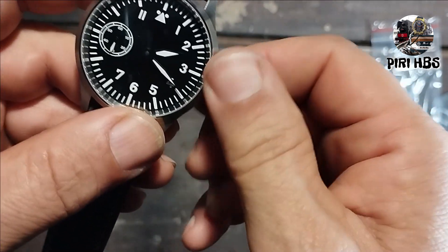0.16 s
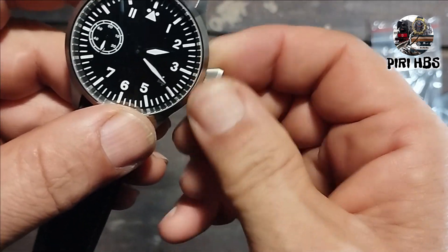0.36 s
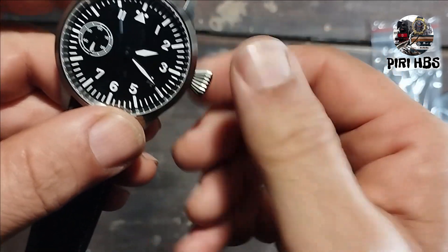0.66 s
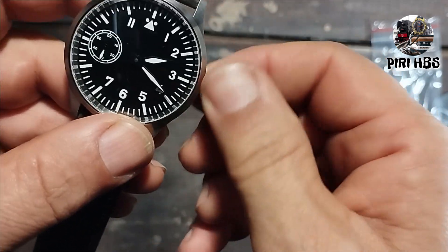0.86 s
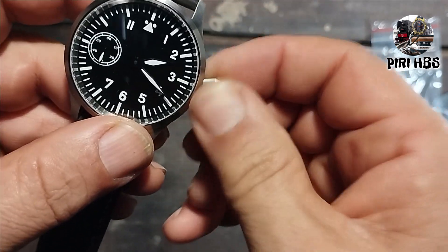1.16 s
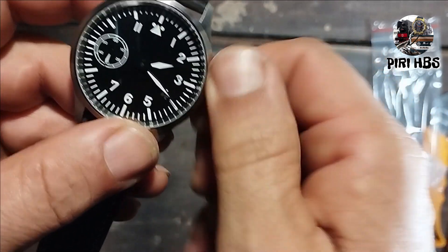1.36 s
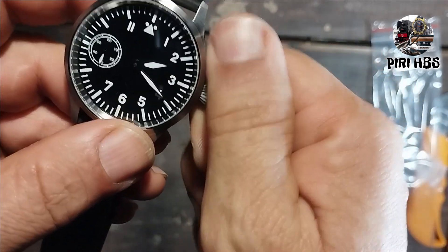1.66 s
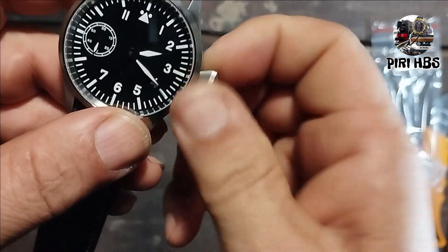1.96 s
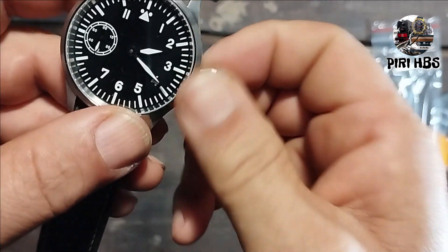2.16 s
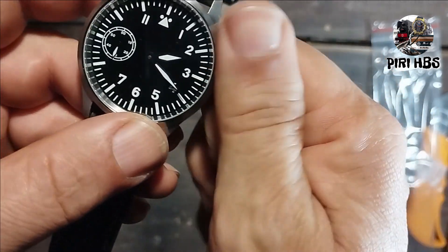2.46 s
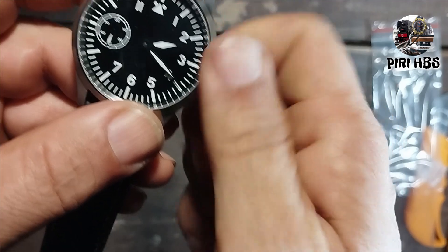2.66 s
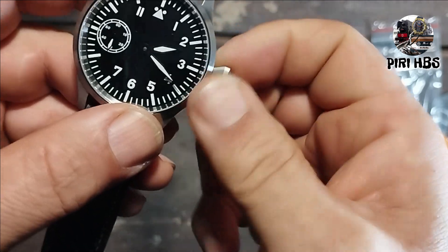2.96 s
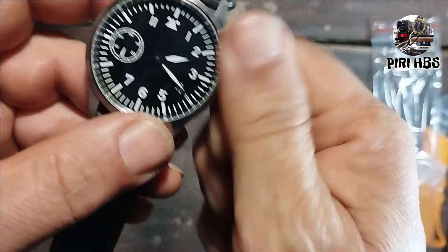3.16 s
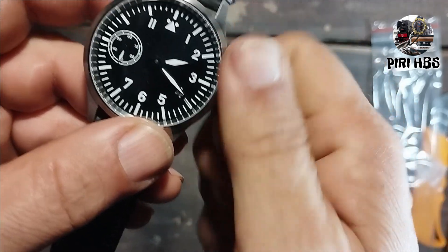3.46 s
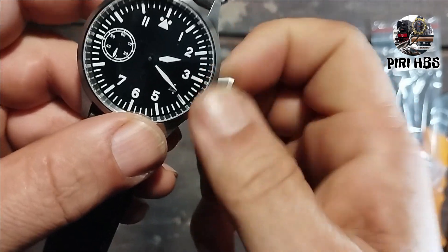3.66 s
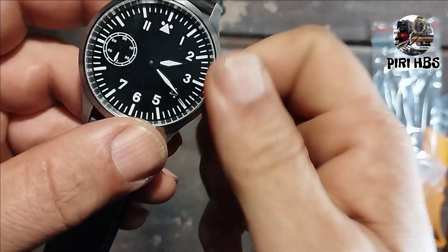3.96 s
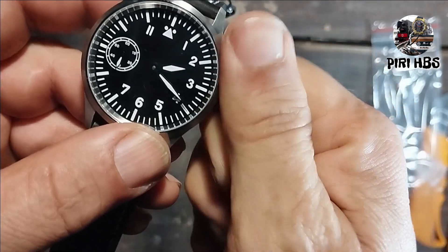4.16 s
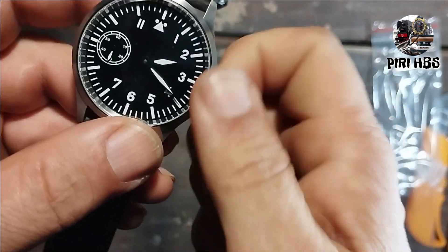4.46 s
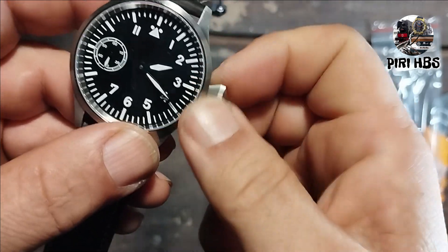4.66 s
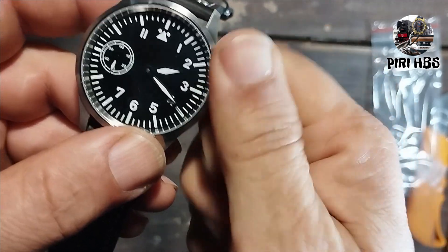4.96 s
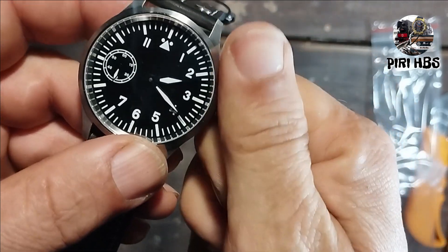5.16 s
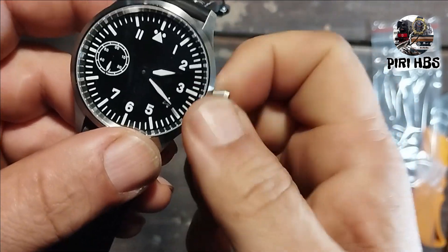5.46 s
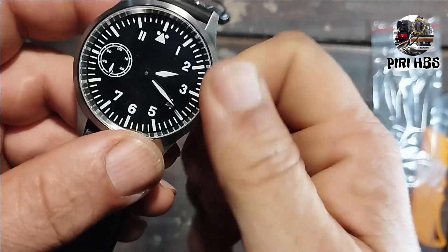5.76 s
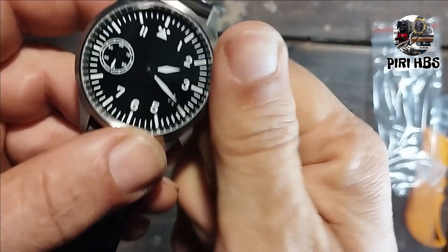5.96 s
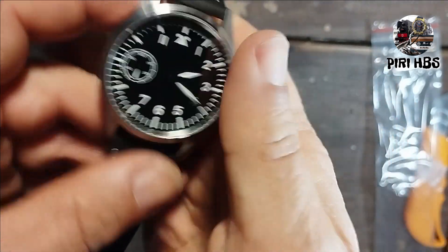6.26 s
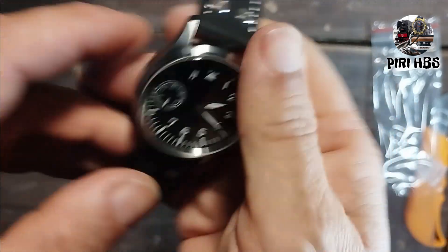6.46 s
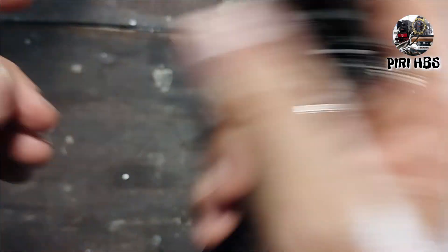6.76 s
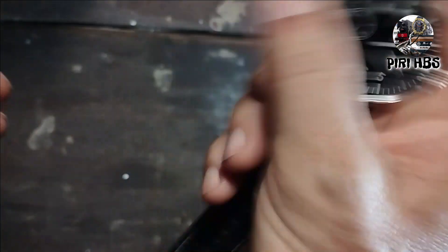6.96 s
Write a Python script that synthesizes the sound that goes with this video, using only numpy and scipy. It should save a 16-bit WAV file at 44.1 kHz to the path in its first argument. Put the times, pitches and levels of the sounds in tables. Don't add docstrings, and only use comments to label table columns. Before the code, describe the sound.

Close metallic ratchet clicks from a wristwatch crown wound back and forth in quick bursts, thinner ticks between, over faint low rumble.

```python
import sys
import numpy as np
from scipy import signal
from scipy.fft import rfft, irfft, next_fast_len
from scipy.io import wavfile
from scipy.ndimage import uniform_filter1d, minimum_filter1d

SR = 44100
rng = np.random.default_rng(int(sys.argv[2]) if len(sys.argv) > 2 else 0)


def voltage_ratio(decibels):
    exponent = np.asarray(decibels, float) / 20
    return 10 ** exponent


def to_wav(s):
    ch = np.atleast_2d(s).T
    pcm = np.round(np.clip(ch, -1, 1) * 32767)
    wavfile.write(sys.argv[1], SR, pcm.astype(np.int16))


N = 314025


def band(x, lo_hz, hi_hz, order=2):
    edges_hz = [lo_hz, min(hi_hz, 0.49 * SR)]
    return signal.sosfilt(signal.butter(order, edges_hz, "band", fs=SR, output="sos"), x)


def unit(x, count=None):
    return x / np.sqrt(np.mean(x[..., :count] ** 2, axis=-1, keepdims=True))


def on_log(table, hz):
    points_hz, values = np.transpose(table)
    return np.interp(np.log(hz), np.log(points_hz), values)


def walk(rate):
    k = int(SR / rate)
    held = np.repeat(rng.standard_normal(N // k + 1), k)
    return 1.38 * uniform_filter1d(uniform_filter1d(held, k), k)[:N]


def delay(x, s):
    size = next_fast_len(len(x))
    hz = np.arange(size // 2 + 1) * SR / size
    return irfft(rfft(x, size) * np.exp(-2j * np.pi * hz * s), size)[:len(x)]


def struck_part(count, modes, lo_hz, hi_hz, rise_s, rattle, rattle_s, crack, crack_s, t):
    ring = 0
    for hz, db, t60 in modes:
        detune, phase, louder, faster = rng.standard_normal((count, 4, 1)).transpose(1, 0, 2)
        turn = 2 * np.pi * (hz * (1 + 0.008 * detune) * t + phase)
        decay = np.exp(-np.log(1000) * t / t60 * voltage_ratio(1.5 * faster))
        ring = ring + voltage_ratio(db + 2.0 * louder) * decay * np.sin(turn)
    ring = ring * np.minimum(t / rise_s, 1)
    release = t / crack_s * np.exp(1 - t / crack_s)
    rebound = 0.083 * rng.random((count, 1)) * np.exp(-((t - 0.0033) / 0.00029) ** 2)
    loose = rattle * np.exp(-t / rattle_s)
    echo = 0.03 * np.exp(-t / 0.02)
    grain = rng.standard_normal((count, len(t)))
    snap = band(grain * (release + rebound + loose + echo), lo_hz, hi_hz, order=3)
    return unit(ring, count=240) * np.sqrt(1 - crack) + unit(snap, count=240) * np.sqrt(crack)


def ratchet(rows, housing, cracks, crack_s):
    # frequency in Hz, level in dB, time to fall by 60 dB in seconds.
    spring = [(5050, -13, .02), (5490, -10, .045), (5600, -16, .07), (5680, 0, .022), (5720, -24, .17),
              (5790, -17, .06), (6220, -10, .025), (7000, -12, .01)]
    wheel = [(7200, -10, 0.0062), (8320, 27, 0.012), (7700, -26, 0.036)]
    tooth_edge = [(11480, -14, 0.032), (12180, 12.5, 0.014), (12450, -14, 0.15), (13000, 0, 0.026)]
    tooth_tip = [(13500, -3, .012), (14200, -3, .012), (14800, -1, .016), (15500, 0, .014)]
    # crack's lowest and highest Hz, left minus right in dB,
    # unlikeness of the two sides (0-1), right side late in seconds, build-up of the ring in seconds,
    # share of rattle (0-1), length of rattle in seconds.
    parts = [
        (2100, 3800, .6, 0.15, 0.00014, .0015, 0.5, 0.01),
        (5000, 7400, 0.6, 0.22, 0.00017, .0009, 0.7, .003),
        (7000, 9500, .8, 0.1, 0.00014, .0007, 0.52, 0.003),
        (11800, 12900, 8, 0.45, 0.000165, .0024, 0.3, 0.006),
        (13200, 15700, 8.5, 0.45, 0.000165, .0009, 0.3, 0.004),
    ]
    t = np.arange(2816) / SR
    fade = np.cos(np.pi / 2 * t / t[-1])
    out = np.zeros((2, N + len(t)))
    at = ((rows[:, :1] - crack_s) * SR).astype(int) + np.arange(len(t))
    all_modes = (housing, spring, wheel, tooth_edge, tooth_tip)
    for k, (modes, settings, crack) in enumerate(zip(all_modes, parts, cracks)):
        lo, hi, pan_db, unlike, lag_s, rise_s, rattle, rattle_s = settings
        both, own = (struck_part(len(rows), modes, lo, hi, rise_s, rattle, rattle_s, crack, crack_s, t)
                     for _ in range(2))
        size = voltage_ratio(rows[:, k + 1:k + 2]) * fade / np.hypot(1, unlike)
        left, right = (np.bincount(at.ravel(), (size * (both + sign * unlike * own)).ravel(), out.shape[1])
                       for sign in (1, -1))
        out += [voltage_ratio(pan_db / 2) * left, voltage_ratio(-pan_db / 2) * delay(right, lag_s)]
    return out[:, :N]


def teeth(tables, housing_db, per_spring_db, per_wheel_db, scatter_db):
    lift_db = (0.1, 0.12, 0.15, 0.48)
    to_peak_s = 0.0009
    rows = np.concatenate(tables)
    away = rows[:, 1:3] - np.median(rows[:, 1:3], axis=0)
    scatter = scatter_db * rng.standard_normal(len(rows))
    housing = housing_db + away @ [per_spring_db, per_wheel_db] + scatter
    return np.c_[rows[:, 0] + to_peak_s, housing, rows[:, 1:] + lift_db]


def winding_strokes():
    # start in seconds, then spring, wheel, tooth edge and tooth tip level in dB.
    early = [(1.3104, -58.5, -54.5, -63, -61.0), (1.3415, -55.0, -52.5, -60.0, -59),
             (1.3826, -66, -57, -64.5, -62.0), (1.418, -60, -55, -64, -66), (1.4435, -63, -55, -66, -59.5),
             (1.4682, -60, -55, -63, -63), (1.501, -59, -55, -64.5, -62.5), (1.5509, -59, -53, -65, -63),
             (1.5848, -57.0, -53.5, -59, -58), (1.6314, -65, -56.5, -63, -65),
             (2.2755, -55, -55.0, -62, -58.0), (2.2945, -56, -56, -59, -63.5),
             (2.322, -62, -51.5, -55, -57.0), (2.3488, -60, -53, -54.0, -60), (2.369, -64, -53.5, -62, -56),
             (2.3865, -60.0, -51, -64, -73), (2.4041, -65, -52, -69, -58), (2.4258, -58, -55, -54.5, -65),
             (2.4528, -66.0, -55.0, -67, -71), (2.4829, -69, -61, -66.5, -62.5),
             (2.5113, -63.5, -59.5, -63, -63), (2.5471, -64.5, -64, -66, -63)]
    middle = [(3.113, -57.0, -54.0, -64.0, -62), (3.1265, -62.0, -59, -67.0, -60.0),
              (3.143, -55, -52, -66, -62.5), (3.1588, -62, -56, -54, -66), (3.1729, -66.0, -53, -74, -61.0),
              (3.1909, -65, -53, -63.5, -64), (3.2187, -61.5, -59, -63, -62.5),
              (3.2503, -63, -57, -67.0, -63.0), (3.269, -56.0, -55, -63, -63),
              (3.2841, -60, -59, -61.0, -56), (3.3023, -61, -57, -71, -59),
              (3.3429, -53.5, -65, -63, -52.0), (3.396, -55.0, -58, -64, -58),
              (3.9901, -51.5, -61.0, -61, -54.5), (4.007, -57, -59.0, -60, -58),
              (4.0238, -55, -58, -60, -61.0), (4.0445, -56, -55, -61, -66), (4.0689, -59.5, -54, -65, -65),
              (4.0906, -54.0, -57, -65.0, -65), (4.113, -54, -57.5, -60.0, -62.5),
              (4.1383, -50.5, -55, -62, -59), (4.1614, -55, -58.0, -65, -60.0),
              (4.184, -54.0, -60, -65, -59), (4.2086, -55, -59, -67, -60), (4.247, -54, -58, -63, -58),
              (4.3221, -52.5, -59.5, -58.0, -50)]
    last = [(4.8973, -54.5, -57, -57.5, -58), (4.9189, -61, -57, -63, -63),
            (4.9352, -57.5, -52, -60, -62.5), (4.9508, -61, -58.5, -66, -64),
            (4.9703, -57, -55.5, -62.0, -64), (4.9927, -51, -62, -66.0, -65.0),
            (5.0207, -53.5, -54, -67, -64.0), (5.0431, -55, -54, -66.5, -61.0),
            (5.0653, -54.5, -60, -65, -62.0), (5.0862, -55.5, -59.5, -65, -59.0),
            (5.1225, -54.5, -54, -63, -62), (5.1606, -57, -61, -69, -61), (5.217, -54, -66, -56.5, -52.5),
            (5.778, -51, -56, -59.5, -58.0), (5.7927, -58.5, -54, -58.5, -57.5),
            (5.8114, -57, -60, -59.0, -60.5), (5.8406, -56.5, -59.5, -63, -63),
            (5.8788, -56.5, -55, -65.0, -62), (5.9069, -58, -58, -62, -60.0), (5.9276, -60, -59, -61, -65),
            (5.9439, -54, -59, -59.0, -52), (5.9677, -52.5, -58.5, -56.5, -57),
            (6.0041, -55.5, -60.5, -63, -51.0), (6.1, -52, -68, -70, -65)]
    # frequency in Hz, level in dB, time to fall by 60 dB in seconds.
    case = [(1837, -15, 0.016), (2366, -14, 0.027), (2660, -14, 0.036), (2820, -0.5, 0.032),
            (2994, -8.5, 0.05), (3130, -8.5, 0.1), (3320, -5, 0.05), (3447, -1, 0.039), (3640, 1, 0.017)]
    rows = teeth((early, middle, last), housing_db=-53, per_spring_db=-0.05, per_wheel_db=0.25, scatter_db=2.3)
    return ratchet(rows, case, cracks=(0.14, 0.54, 0.47, 0.71, 0.7), crack_s=0.00055)


def return_strokes():
    # start in seconds, then spring, wheel, tooth edge and tooth tip level in dB.
    early = [(0.2428, -66.5, -68.0, -69, -71.0), (0.2523, -78, -84.0, -84.5, -90),
             (0.2932, -69.5, -74, -64, -73), (0.338, -67.0, -70, -64, -78), (0.3775, -63.0, -63, -76, -72),
             (0.4389, -66.5, -63, -61.5, -80), (0.4758, -69, -59.5, -70, -65.5),
             (0.5247, -65.5, -64.5, -71, -71.0), (0.9202, -71.5, -67, -76, -71.0),
             (0.9683, -70.0, -68.0, -70, -69.5), (0.9946, -63.5, -69.0, -73.0, -75.5),
             (1.0174, -68, -64.5, -68, -65.5), (1.0633, -63.5, -64, -65, -66),
             (1.2527, -67, -64, -68.0, -74), (1.8414, -66.5, -81, -78, -76), (1.85, -65, -72, -77.0, -74),
             (1.8726, -65.5, -68, -75, -70.5), (1.8981, -55, -64.0, -70, -68),
             (1.925, -68, -67, -68, -68.0), (1.9492, -70, -71, -73, -68), (1.9804, -68, -63, -68, -64.5),
             (2.021, -64.0, -67.0, -69, -67), (2.048, -62.5, -66, -66.0, -70),
             (2.0688, -60.0, -66, -69, -69.0), (2.0984, -67, -67, -66, -67.0),
             (2.2294, -65.5, -75.5, -83, -79)]
    middle = [(2.6623, -65.5, -80, -85, -78.0), (2.6732, -61, -74, -80, -71.5),
              (2.6932, -72, -67.0, -76, -71), (2.7188, -64, -68.0, -75, -68),
              (2.7415, -67, -67, -75.5, -70), (2.759, -68.5, -71.0, -72, -73.0),
              (2.7728, -66, -64, -71, -63.5), (2.791, -70, -67, -72, -70.0), (2.8576, -71.5, -65, -75, -67),
              (2.8875, -64, -72, -73, -73), (2.9178, -70, -69, -71, -69.0), (3.0612, -73, -76, -81, -84),
              (3.5219, -64.5, -72, -84, -76), (3.534, -63, -72, -81.5, -74.5),
              (3.5557, -65.0, -71.0, -69, -69), (3.5757, -79, -63.5, -74, -73),
              (3.5972, -65.5, -68.0, -75, -69), (3.6197, -68, -70, -70.0, -72),
              (3.6411, -70, -68, -74.5, -68.0), (3.661, -69, -65, -75, -67.0),
              (3.6867, -67, -70.5, -70, -68), (3.7279, -70.5, -62, -76, -68.0),
              (3.7595, -64, -68.0, -72, -69.0), (3.7826, -68.5, -70.5, -76, -72.0),
              (3.9207, -68.5, -81.0, -78, -73)]
    last = [(4.3635, -73, -84, -87, -96), (4.395, -65, -80.5, -85, -81), (4.4042, -70.5, -79.0, -85, -71.0),
            (4.4253, -69.0, -74, -82, -73), (4.4454, -71, -66, -75, -77), (4.4668, -63.5, -70, -72.5, -71),
            (4.488, -66, -73.5, -73, -65), (4.5082, -62.5, -68, -74.0, -75), (4.5341, -68, -64.5, -74, -65),
            (4.566, -69, -71, -75, -67), (4.597, -68, -64, -70, -71.0), (4.6238, -65.5, -66, -73, -63),
            (4.6529, -70, -70, -78, -67), (4.811, -68.0, -75, -79.5, -73.5), (4.874, -82, -80, -80, -92),
            (5.335, -65.0, -92, -91, -79), (5.3463, -64.5, -76.0, -81, -88), (5.366, -69.5, -71, -78, -71),
            (5.383, -69.0, -68, -73, -71.5), (5.3988, -64.5, -72, -71.5, -68.5),
            (5.4154, -64, -67.5, -77, -71.0), (5.4331, -68.5, -72.0, -79, -72),
            (5.457, -64, -65, -73.5, -69.5), (5.5062, -68.5, -72, -73, -66.0), (5.5384, -69, -63, -68, -66),
            (5.5931, -66.0, -70, -73, -69.0), (5.7132, -67.0, -70, -83, -79.5),
            (6.577, -73, -91, -94.5, -88), (6.698, -82, -100, -80, -78.0)]
    # frequency in Hz, level in dB, time to fall by 60 dB in seconds.
    back_case = [(2550, -1, 0.0055), (3400, 13, 0.011), (4290, 11, 0.012)]
    rows = teeth((early, middle, last), housing_db=-69, per_spring_db=0.07, per_wheel_db=-0.03, scatter_db=5)
    return ratchet(rows, back_case, cracks=(0.36, 0.71, 0.86, 0.33, 0.54), crack_s=0.00045)


def fingers():
    # middle in seconds, length in seconds, level in dB, centre in Hz.
    rubs = [(1.283, 0.082, -72, 13500), (1.838, 0.044, -78.5, 13440), (2.66, 0.038, -67, 13700),
            (3.52, 0.053, -68.5, 13400), (4.395, 0.073, -69, 13100), (5.331, 0.039, -67, 13300),
            (6.054, 0.076, -70.5, 13250), (6.434, 0.14, -74.5, 13900), (6.56, 0.079, -81, 13500),
            (6.637, 0.4, -78, 13600), (6.789, 0.044, -66.5, 13990), (6.79, 0.043, -74.5, 4170),
            (6.899, 0.046, -74.5, 3930), (6.742, 0.072, -78, 5392), (5.6, 0.21, -76.5, 1320),
            (6.399, 0.18, -85, 5800), (7.05, .03, -81, 3760), (7.01, .3, -88, 14000)]
    out, t = np.zeros((2, N)), np.arange(N) / SR
    for s, length, db, hz in rubs:
        first = int((s - 0.2) * SR)
        left, right, grain = rng.standard_normal((3, int(SR * 0.4)))
        rough = np.array([left, right]) * voltage_ratio(6.4 * abs(grain))
        near = slice(first, min(first + len(grain), N))
        swish = unit(band(rough, 0.84 * hz, 1.33 * hz, order=3))[:, :near.stop - first]
        swell = np.exp(-(2 * (t[near] - s) / length) ** 2)
        out[:, near] += voltage_ratio(db + np.array([[2.5], [-2.5]])) * swish * swell
    return out


def engine():
    # time in seconds, firing rate in Hz, firing tone in dB, exhaust overtones in dB.
    firing = [(0, 68.94, -45.5, -61), (.12, 68.67, -47, -56.5), (.58, 69.14, -77, -50.5),
              (.75, 70.16, -56, -50), (.85, 70.38, -58, -76), (.97, 71.9, -46.5, -57),
              (1.4, 71.8, -49, -58), (1.75, 73.27, -44, -59), (2.25, 73.53, -48, -57.5),
              (2.6, 73.6, -44, -70), (3.6, 74, -53.5, -73), (4.35, 73.64, -48.5, -78),
              (4.6, 71.67, -56, -75), (5.3, 71.63, -63, -69.5), (5.65, 70.6, -47.5, -70),
              (5.97, 69.3, -60.5, -65), (6.19, 68.87, -46, -71.5), (7.12, 64.8, -61.5, -66)]
    # time in seconds, frequency in Hz, level in dB.
    drone = [
        (0, 33, -51),
        (.2, 34.17, -44.5),
        (.45, 36.11, -54.5),
        (6.8, 33.96, -66),
        (7.0, 32.4, -46),
        (7.12, 32.6, -43),
    ]
    t = np.arange(N) / SR
    firing_s, *columns = np.transpose(firing)
    hz, tone_db, over_db = [np.interp(t, firing_s, c) for c in columns]
    drone_s, *columns = np.transpose(drone)
    half_hz, half_db = [np.interp(t, drone_s, c) for c in columns]
    turn = 2 * np.pi * np.cumsum(hz * (1 + 0.011 * walk(7))) / SR
    lines = []
    for k, db in enumerate((tone_db, over_db, over_db - 7.5)):
        waver_db = -1.5 + 2.5 * walk(12)
        lines.append(np.sqrt(2) * voltage_ratio(db + waver_db) * np.sin((k + 1) * turn + k))
    half = np.sqrt(2) * voltage_ratio(half_db) * np.sin(2 * np.pi * np.cumsum(half_hz) / SR)
    return voltage_ratio(np.array([[-1.2], [1.2]])) * lines[0] + lines[1] + lines[2] + half


def traffic_swell():
    # time in seconds, heavy rumble in dB, lean to the deeper room mode in dB, tyre roar in dB.
    traffic = [(0.0, -3, 23, -3.5), (0.22, 6.5, 1, -1.5), (0.711, 4.5, -1.5, -1.5), (1.781, 9.5, -1, -0.5),
               (3.65, 5.5, -3, -0.2), (4.0, 8.5, 10.5, -2.5), (4.26, 1.5, -9, 0.5), (4.44, 3.5, 10.5, -1.5),
               (4.9, 5, -13, 1), (5.45, 3.5, 7.5, 0), (6.7, 2.5, 0.5, -2), (7.12, -5.5, -6, -1.5)]
    # rumble, lean and tyres, all in dB per dB.
    reach = [
        (0.69, 0.66, 0.5),
        (0.47, -1, -2.5),
        (0.34, 0.024, -1),
        (0, 0.13, 2),
        (0.049, 0.093, 0.93),
        (0.19, 0.079, 1),
    ]
    s, *controls = np.transpose(traffic)
    t = np.arange(N) / SR
    return np.array(reach) @ np.array([np.interp(t, s, c) for c in controls])


def room():
    # frequency in Hz, level in dB per Hz.
    boom = [(18, -24.5), (25, -10.5), (34, -5), (44, -4), (55, -3), (64, -10.5), (85, -14), (100, -9.5),
            (120, -22.5), (190, -20.5), (225, -23), (260, -20), (330, -24), (370, -29)]
    hiss = [(370, -34.5), (465, -30), (616, -33), (863, -37.5), (2060, -45.5), (4000, -51.5), (6900, -52.5),
            (9000, -72.5), (11100, -46), (12500, -60), (14700, -50), (16500, -50)]
    # frequency in Hz, likeness from -1 to 1.
    likeness = [(30, 0.82), (60, 0.96), (130, 0.61), (290, 0.73), (640, -0.15), (1400, -0.25), (3100, 0.12),
                (6800, -0.037), (15000, -0.28)]
    out, swell = 0, traffic_swell()
    places = np.log([33, 53, 100, 290, 1000, 4000])
    edges = np.r_[20 * 2 ** (np.arange(21) / 5), 370 * 2 ** (np.arange(13) / 2.2)]
    for lo, hi in zip(edges[:-1], edges[1:]):
        hz = np.sqrt(lo * hi)
        mid, side = unit(band(rng.standard_normal((2, N)), lo, hi))
        place = np.interp(np.log(hz), places, np.arange(6))
        k = min(int(place), 4)
        swell_db = swell[k] + (place - k) * (swell[k + 1] - swell[k]) + 1.03 * walk(8)
        like = np.clip(on_log(likeness, hz), -1, 1)
        pair = np.sqrt(1 + like) * mid + np.sqrt(1 - like) * side * np.array([[1], [-1]])
        level_db = on_log(boom + hiss, hz) + 10 * np.log10(hi - lo)
        out = out + voltage_ratio(level_db + swell_db) * pair
    return out * voltage_ratio(-66.5)


def scene():
    watch = winding_strokes() + return_strokes()
    top = signal.ellip(8, 0.3, 50, 15800, fs=SR, output="sos")
    return watch + signal.sosfilt(top, fingers() + engine() + room())


def thin_treble(x):
    # frequency in Hz, dB under a threshold that rises with the click up to a cap.
    margins = [(3000, 21), (4200, 11), (5700, 17), (7000, 11), (8300, 13), (10500, 9), (11600, 15),
               (12600, 18), (13200, 5), (16000, 4)]
    cap_db = 14
    padded = np.pad(x, ((0, 0), (0, 2048)), "reflect")
    hz, _, cells = signal.stft(padded, SR, nperseg=256, boundary="even")
    power = abs(cells) ** 2
    loudest = -minimum_filter1d(-uniform_filter1d(power, size=21, axis=1).max(axis=0), size=13, axis=1)
    usual = np.median(power, axis=(0, 2))[:, None]
    patches = rng.standard_normal((len(hz) // 4 + 1, power.shape[2] // 2 + 1))
    whim_db = 3.5 * patches.repeat(4, axis=0).repeat(2, axis=1)[:len(hz), :power.shape[2]]
    under_db = on_log(margins, hz + 1)[:, None] + whim_db * (hz < 13000)[:, None]
    threshold = usual * np.minimum(loudest / usual, voltage_ratio(2 * cap_db)) * voltage_ratio(-2 * under_db)
    keep = uniform_filter1d(power, size=2, axis=1) > threshold
    keep = keep | (hz < 3000)[:, None]
    return signal.istft(cells * keep, SR, nperseg=256)[1][:, :N]


def low_pass(x):
    return signal.sosfilt(signal.butter(12, 16840, fs=SR, output="sos"), x)


def record(dry):
    cut = signal.sosfilt(signal.ellip(8, 0.3, 60, 16500, fs=SR, output="sos"), dry)
    ending = np.minimum(np.arange(N)[::-1] / 200, 1)
    return low_pass(thin_treble(cut) * ending)


dry = scene()
out = record(dry)
to_wav(out)
```